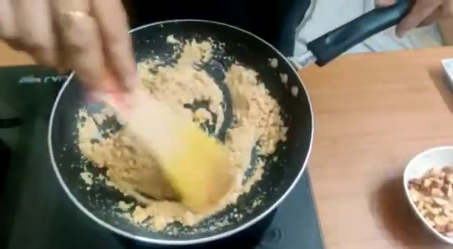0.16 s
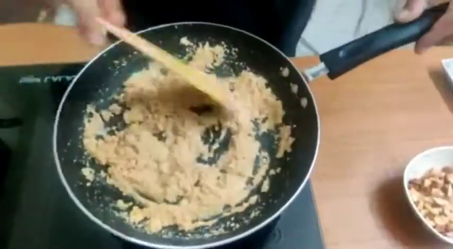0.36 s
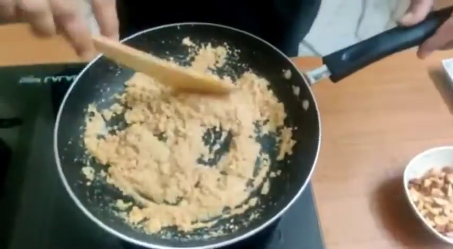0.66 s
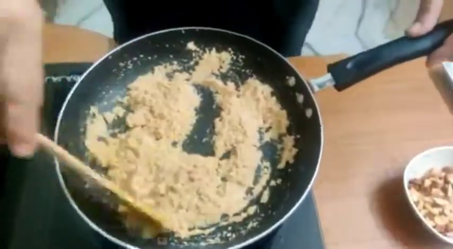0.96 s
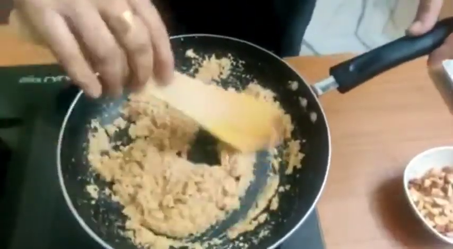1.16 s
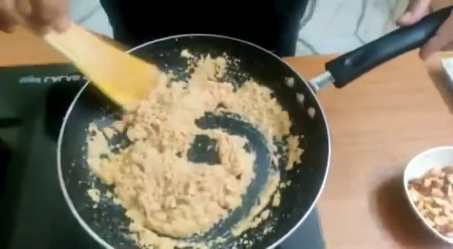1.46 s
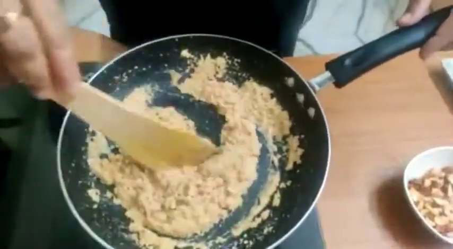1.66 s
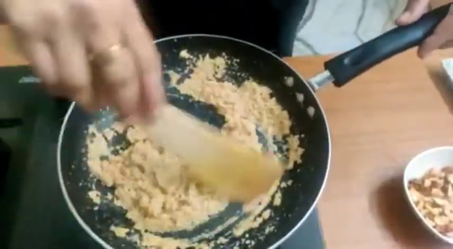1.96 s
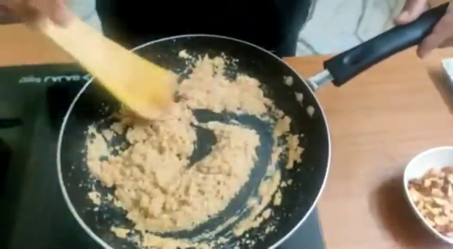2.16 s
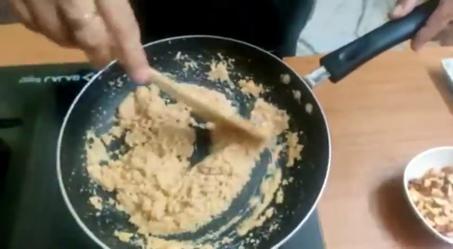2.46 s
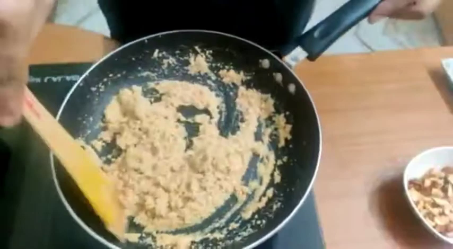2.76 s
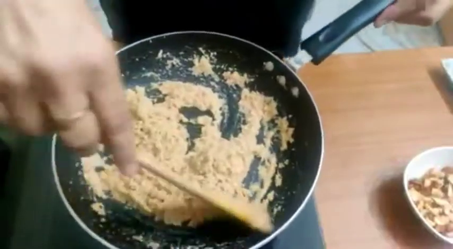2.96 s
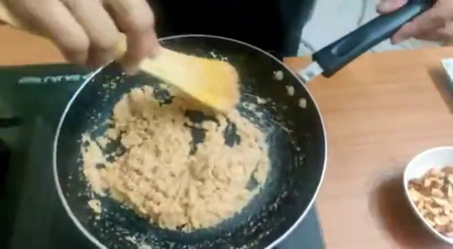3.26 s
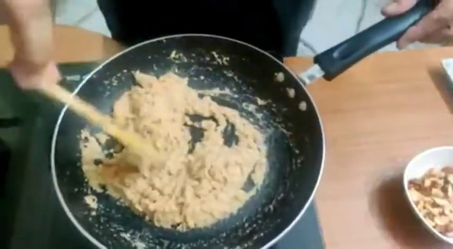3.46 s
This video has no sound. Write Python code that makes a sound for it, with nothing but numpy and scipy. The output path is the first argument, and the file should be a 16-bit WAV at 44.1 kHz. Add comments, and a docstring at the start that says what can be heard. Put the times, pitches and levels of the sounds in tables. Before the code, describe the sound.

A wooden spatula stirs moist semolina in a nonstick pan, in repeated gritty, hissing scrapes. Grains snap, the blade knocks lightly and bangles clink faintly now and then, close to the microphone in a small, quiet kitchen.

```python
"""A small kitchen, close to the hob, on a stereo microphone over quiet room tone.
A wooden spatula stirs moist roasting semolina in a nonstick pan. Each stroke crushes grains
under the blade: the friction hisses, rings blade and pan, and makes the pan hum on the hob.
Hard grains snap, the blade catches, and bangles on the stirring wrist clink now and then."""
import sys
import numpy as np
from scipy import signal
from scipy.fft import rfft, irfft, next_fast_len
from scipy.io import wavfile
from scipy.ndimage import uniform_filter1d

SR = 44100
rng = np.random.default_rng(int(sys.argv[2]) if len(sys.argv) > 2 else 0)


def generate_wav(sig):
    """Save sig (samples, or channels by samples) to the path in sys.argv[1] as 16-bit PCM at SR."""
    pcm = np.round(np.clip(np.atleast_2d(sig).T, -1, 1) * 32767).astype(np.int16)
    wavfile.write(sys.argv[1], SR, pcm)


N = 158760
FLAT_ABOVE_HZ, CUTOFF_HZ = 15000, 15900
WANDER_DB, WANDER_PER_S = 1.5, 6   # resonances and hiss bands swell as the contact moves


def from_db(db):
    """Amplitude gain of a level in dB."""
    return 10 ** (np.asarray(db) / 20)


def unit_rms(x):
    """The signal scaled to rms 1."""
    return x / np.sqrt(np.mean(x ** 2) + 1e-20)


def at_hz(curve, hz):
    """Reads a curve on a log-frequency axis."""
    points_hz, values = np.transpose(curve)
    return np.interp(np.log(hz + 1), np.log(points_hz), values)


def colour(x, gain):
    """Weights the spectrum by a function of frequency."""
    return irfft(rfft(x) * gain(np.fft.rfftfreq(N, 1 / SR)), N)


def drift(rate_hz):
    """A smooth random wander of rms about 1."""
    step, settle = 40, 2000
    r = np.exp(-2 * np.pi * step * rate_hz / SR)
    slow = signal.lfilter([1], [1, -2 * r, r * r], rng.standard_normal(N // step + settle + 2))[settle:]
    return np.interp(np.arange(N) / step, np.arange(len(slow)), unit_rms(slow))


def resonance(x, hz, width_hz):
    """A two-pole resonance with gain 1 at its peak."""
    r = np.exp(-np.pi * width_hz / SR)
    poles = [1, -2 * r * np.cos(2 * np.pi * hz / SR), r * r]
    return signal.lfilter(np.array([1, 0, -1]) * (1 - r * r) / 2, poles, x + 1e-18)


# How alike left and right are at the microphone: frequency_hz, correlation
STEREO_LIKENESS = [(25, 0.61), (60, 0.77), (130, 0.97), (300, 0.98), (700, 0.78), (1500, 0.48),
                   (3000, 0.12), (8000, 0.025)]


def stereo_noise():
    """Noise at the two ports, alike in the bass and unlike in the treble."""
    mid = colour(rng.standard_normal(N), lambda hz: np.sqrt(1 + at_hz(STEREO_LIKENESS, hz)))
    side = colour(rng.standard_normal(N), lambda hz: np.sqrt(1 - at_hz(STEREO_LIKENESS, hz)))
    return np.array([mid + side, mid - side])


# Spectrum of the quiet kitchen: frequency_hz, relative_db
ROOM_SPECTRUM = [(13, -18), (22, 19.5), (70, -2), (211, -4.5), (444, -16), (510, -16.5), (1040, -24),
                 (3420, -32.5), (4140, -32.5), (4890, -26), (5770, -33.5), (8970, -42.5), (11800, -37),
                 (14700, -32.5), (16000, -54)]


def room_tone(level_db=-59, waver_db=.5, bass_cut_hz=45):
    """The kitchen's low steady noise, wavering slightly."""
    def spectrum(hz):
        bass_cut = hz ** 2 / (hz ** 2 + bass_cut_hz ** 2)
        return from_db(at_hz(ROOM_SPECTRUM, np.minimum(hz, FLAT_ABOVE_HZ))) * bass_cut
    noise = unit_rms(colour(stereo_noise(), spectrum))
    return from_db(level_db + waver_db * drift(0.72)) * noise


def kitchen_reverb(x, t60_s=0.33, wall_cut_hz=41000, bass_cut_hz=527):
    """Near walls return the sound: eight feedback delays a side, duller on every round."""
    size = next_fast_len(N + SR)
    hz, out = np.fft.rfftfreq(size, 1 / SR), []
    dulling, bass_cut = 1 / (1 + 1j * hz / wall_cut_hz), hz / np.hypot(hz, bass_cut_hz)
    for side, lags_s in zip(x, rng.uniform(.012, .035, (2, 8))):
        loops = [from_db(-60 * lag / t60_s) * dulling * np.exp(-2j * np.pi * hz * lag) for lag in lags_s]
        echoes = sum((-1) ** k * loop / (1 - loop) for k, loop in enumerate(loops))
        out.append(irfft(rfft(side, size) * bass_cut * echoes, size)[:N])
    return np.array(out)


# Modes of a bangle: pitch_hz, relative_db, t60_s
BANGLE_MODES = [(8425, -1, .1), (9146, -1, .055), (13600, -14, .05), (14540, -5, .04), (14690, 0, .048),
                (15190, -10, .04)]
# Clinks at the stirring wrist: start_s, level_db, low_modes_db, top_modes_db
BANGLE_CLINKS = [(.143, -45, -4, 0), (0.712, -44.5, -6, 0), (0.721, -41, -22, 0), (0.7704, -38, -22, -1.5),
                 (1.6, -48, -16, 0), (2.306, -32, -27, -21)]


def bangles(rise_s=.0003):
    """Thin hard rings touch and ring in a few high modes, reaching each port at its own phase."""
    out, t = np.zeros((2, N)), np.arange(SR // 4) / SR
    attack = 1 - np.exp(-(t / rise_s) ** 2)
    for start_s, level_db, low_db, top_db in BANGLE_CLINKS:
        span = slice(int(start_s * SR), int(start_s * SR) + len(t))
        for hz, mode_db, t60_s in BANGLE_MODES:
            struck_db = level_db + mode_db + low_db * (hz < 10000) + top_db * (hz > 14000)
            tone = np.sin(2 * np.pi * (hz * t + rng.random((2, 1)) / 4))
            out[:, span] += from_db(struck_db - 60 * t / t60_s) * attack * tone
    return out


# Lone hard grains in the pan: start_s, unfiltered_db, lowest_hz
HARD_GRAINS = [(0.1819, -31.5, 1190), (0.9328, -47, 4500), (.985, -43, 6000), (1.055, -37, 4500),
               (1.4686, -42, 1200), (1.996, -34, 1200), (2.318, -41, 1200), (2.433, -41, 4000),
               (2.7417, -55, 2000), (3.297, -43, 1210), (3.565, -56, 4000)]


def grain_snaps(decay_s=.0015, band_octaves=2.3):
    """Single hard grains snap in a puff of noise; the small ones are brighter."""
    out, noise = np.zeros((2, N)), stereo_noise()
    t = np.arange(SR // 50) / SR
    for start_s, level_db, low_hz in HARD_GRAINS:
        span = slice(int(start_s * SR), int(start_s * SR) + len(t))
        high_hz = min(low_hz * 2 ** band_octaves, CUTOFF_HZ)
        band = signal.butter(2, [low_hz, high_hz], "band", fs=SR, output="sos")
        out[:, span] += signal.sosfilt(band, from_db(level_db) * np.exp(-t / decay_s) * noise[:, span])
    return out


# Modes of the pan, the blade's body and its edge: pitch_hz, width_hz, rubbed_db
PAN_MODES = [(202.5, 12, 0.5), (242.7, 3.8, -7), (276, 15.6, 0.5), (334, 23.5, -2), (402.4, 30, -1),
             (504.6, 24.4, 4), (556, 23, 5), (581, 64, 4)]
BLADE_BODY_MODES = [(791, 178, 4), (990, 107, -1.5), (1162, 114, -4.5), (1330, 38, -3.5), (1412, 41, -4),
                    (1563, 190, 5.5)]
BLADE_EDGE_MODES = [(1865, 136, 0.5), (2097, 395, -1.5), (2870, 490, -7.5), (3590, 304, 3), (3746, 550, -2)]
# The blade catches on the pan: start_s, level_db, favoured_hz
BLADE_CATCHES = [(.181, -42, 3540), (.629, -43, 1110), (0.687, -44, 1310), (0.702, -53, 1350),
                 (2.403, -37.5, 344), (2.445, -30.5, 1010), (3.04, -36.5, 350), (3.114, -35.5, 810),
                 (3.154, -39, 1290)]


def blade_knocks(focus_db_per_octave=30):
    """Each catch strikes the modes of blade and pan, hardest near its favoured pitch."""
    out = np.zeros(N)
    start_s, level_db, favoured_hz = np.transpose(BLADE_CATCHES)
    for k, (hz, width_hz, _) in enumerate(PAN_MODES + BLADE_BODY_MODES + BLADE_EDGE_MODES):
        octaves_off = np.abs(np.log2(hz / favoured_hz))
        clicks = np.zeros(N)
        clicks[(start_s * SR).astype(int)] = from_db(level_db - focus_db_per_octave * octaves_off)
        out += (-1) ** k * resonance(clicks, hz, width_hz) * SR / (2 * np.pi * width_hz)
    return out


def friction(grains_per_s=830, size_spread_db=2, grain_s=0.0013, smooth_share=0.49):
    """Grains of all sizes break at random over a smooth rub, while the blade skips."""
    sizes = from_db(size_spread_db * np.minimum(rng.exponential(1, N), 5))
    breaks = sizes * (rng.random(N) < grains_per_s / SR)
    puffs = unit_rms(signal.lfilter([1], [1, -np.exp(-1 / (grain_s * SR))], breaks + 1e-18))
    force = np.sqrt(smooth_share + (1 - smooth_share) * puffs ** 2)
    chatter = from_db(1.5 * drift(rate_hz=55))
    return force * chatter * stereo_noise()


def steadied(ring, hz, share=.6, cycles=6):
    """The push of the blade evens out part of a ring's chance swings."""
    power = uniform_filter1d(np.mean(ring ** 2, axis=0), size=int(cycles * SR / hz))
    return unit_rms(ring / (np.abs(power) + 1e-6) ** (share / 2))


def ringing(rub, modes, favoured_hz, focus_db_per_octave=26, focus_limit_db=13):
    """A rubbed part answers through its modes; those far from the favoured pitch are held back."""
    out, power = 0, 0
    for k, (hz, width_hz, mode_db) in enumerate(modes):
        held_db = np.minimum(focus_db_per_octave * np.abs(np.log2(hz / favoured_hz)), focus_limit_db)
        gain = from_db(mode_db + WANDER_DB * drift(WANDER_PER_S) - held_db)
        ring = unit_rms(resonance(resonance(rub, hz, 2 * width_hz), hz, 2 * width_hz))
        out += (-1) ** k * gain * steadied(ring, hz)
        power += gain ** 2
    return out / np.sqrt(power)


# Hiss of semolina under the blade: frequency_hz, relative_db
GRIT_SPECTRUM = [(3290, -15), (5600, 4.5), (6450, 4), (8900, 1), (10100, -3), (12200, -2), (15100, -3.5),
                 (15600, -13)]
# Bands of that hiss, each wandering alone: boundary_hz
GRIT_BANDS = [3000, 7500, 9600, 12500, 17000]


def grit(rub, level_db, finest_above_hz=9000, finest_follows=.75):
    """The hiss of crushed grains shifts in colour band by band; the finest swells least."""
    hiss = unit_rms(colour(rub, lambda hz: from_db(at_hz(GRIT_SPECTRUM, np.minimum(hz, FLAT_ABOVE_HZ)))))
    held_db = (1 - finest_follows) * np.maximum(level_db - np.median(level_db), 0)
    out = np.zeros((2, N))
    for low, high in zip(GRIT_BANDS, GRIT_BANDS[1:]):
        band_db = level_db + WANDER_DB * drift(WANDER_PER_S) - held_db * (low > finest_above_hz)
        out += from_db(band_db) * colour(hiss, lambda hz: (hz > low) & (hz <= high))
    return out


# Modes of the pan's wall and of the pan on the hob: pitch_hz, width_hz, rubbed_db
PAN_WALL_MODES = [(4480, 200, -10), (4790, 190, 1), (5180, 240, 0), (5700, 300, -9)]
HOB_MODES = [(133, 12, 0)]
# The spatula close up, one list a stroke; the last three columns are favoured pitches:
# time_s, grit_db, wall_db, edge_db, body_db, pan_db, hob_db, edge_hz, body_hz, pan_hz
SPATULA_STROKES = [
    [(0.0, -54, -62, -58, -66, -53, -51, 2880, 1090, 260),
     (0.032, -68, -67, -70, -75, -65, -64, 2790, 1080, 233),
     (0.046, -70, -73, -67, -76, -78, -62.5, 2510, 1080, 224),
     (0.06, -67, -75, -75, -73, -67, -61, 2420, 1050, 228),
     (0.074, -79, -77, -73, -89, -60, -77, 2400, 1030, 235),
     (0.084, -90, -83, -93, -89, -68, -72, 2450, 982, 247),
     (0.124, -90, -92, -92, -75, -73, -83, 2550, 897, 263),
     (0.135, -88, -72, -93, -81, -83, -81, 2530, 900, 249)],
    [(0.172, -58, -68, -63, -70, -70, -75, 3460, 1500, 384),
     (0.182, -55, -53, -42.5, -55, -56, -73, 3660, 1460, 395),
     (0.252, -42, -41, -41.5, -56.5, -55.5, -57, 2780, 1410, 443),
     (0.302, -49.5, -51.5, -51, -56, -59, -59, 2440, 1120, 373),
     (0.342, -53, -59, -55, -61.5, -62.5, -61, 3000, 1160, 249),
     (0.396, -56, -65, -64, -69, -66.5, -63, 2600, 1080, 350),
     (0.478, -83, -79, -81, -81, -65.5, -89, 2540, 823, 238),
     (0.6, -75, -87, -84, -99, -82, -80, 2470, 853, 256)],
    [(0.616, -55.5, -64, -64.5, -76, -70, -59, 2520, 1110, 287),
     (0.634, -52, -55, -56.5, -49.5, -55.5, -64, 2770, 1060, 312),
     (0.676, -50, -53.5, -52, -53, -60.5, -59, 2450, 1260, 326),
     (0.712, -49, -55, -54.5, -51, -67, -69, 2640, 1250, 306),
     (0.746, -60, -63, -61.5, -81, -68, -73, 2800, 1210, 265),
     (0.79, -59, -62, -62.5, -66, -64, -72, 2700, 1080, 254),
     (0.812, -62.5, -69, -67, -73, -76, -83, 2730, 1040, 264),
     (0.88, -69, -76, -72, -78, -63, -66, 2730, 912, 259)],
    [(0.885, -63.5, -70.5, -68.5, -68, -61, -58.5, 2820, 930, 240),
     (1.028, -55.5, -61, -57.5, -53, -53.5, -51.5, 2820, 960, 252),
     (1.051, -44.5, -49, -56.5, -52, -47, -44, 2830, 950, 264),
     (1.087, -49.5, -50, -51, -54.5, -51.5, -42, 2900, 1120, 216),
     (1.133, -44.5, -48.5, -51, -49.5, -48.5, -51.5, 2780, 1100, 266),
     (1.169, -48, -56, -49.5, -51, -51.5, -43, 2730, 1300, 203),
     (1.295, -58, -59, -62, -66.5, -65.5, -65.5, 2620, 1010, 230),
     (1.407, -73, -84, -79, -100, -84, -72, 2630, 1020, 220),
     (1.44, -67, -78, -70, -86, -85, -91, 2850, 965, 260)],
    [(1.45, -60, -72, -66, -74, -75, -69, 2250, 1310, 280),
     (1.47, -51, -63, -47, -65, -67, -69, 2200, 1210, 377),
     (1.498, -51, -47.5, -46, -46.5, -56.5, -73, 2540, 1080, 413),
     (1.576, -52, -56, -50.5, -48.5, -55, -66, 2390, 1080, 347),
     (1.626, -44, -44, -48.5, -41.5, -65, -74, 2850, 996, 475),
     (1.686, -65.5, -75, -62.5, -75, -61, -82, 2780, 960, 258),
     (1.786, -95, -85, -83, -73, -89, -85, 2630, 901, 266),
     (1.815, -77, -87, -89, -100, -83, -87, 2480, 869, 223)],
    [(1.822, -65, -74, -80, -62, -78, -86, 2820, 1080, 272),
     (1.838, -58, -65, -60, -57, -53.5, -61, 2900, 1140, 270),
     (1.95, -46, -47, -53, -53.5, -49, -52.5, 2820, 1000, 274),
     (1.984, -42, -58, -47.5, -58.5, -60, -75, 3280, 1140, 307),
     (2.002, -44.5, -48, -44, -45.5, -58, -75, 2760, 1130, 326),
     (2.072, -54.5, -55.5, -52, -58.5, -62, -55.5, 2570, 1480, 245),
     (2.162, -56, -59.5, -62.5, -70, -68, -67, 2680, 1320, 243),
     (2.298, -91, -96, -82, -99, -81, -76, 2200, 1090, 229)],
    [(2.309, -71, -62, -82, -91, -76, -70, 2270, 1120, 320),
     (2.317, -47, -54.5, -44, -52.5, -62, -63, 2500, 1090, 319),
     (2.365, -48.5, -50.5, -45.5, -52, -47.5, -48, 2710, 1070, 330),
     (2.457, -46, -51, -51, -44.5, -52, -52, 2860, 1040, 350),
     (2.499, -54, -54, -57.5, -71, -52, -66, 2690, 1110, 500),
     (2.609, -70, -74, -71, -69, -74, -65.5, 2500, 1070, 243),
     (2.697, -88, -88, -86, -72, -62, -59, 2390, 1010, 229),
     (2.72, -63, -72, -67, -67, -77, -68, 2130, 1230, 220)],
    [(2.73, -55, -72, -55, -66, -68, -72, 2880, 926, 349),
     (2.74, -43, -42.5, -47.5, -49.5, -59.5, -63, 2820, 900, 355),
     (2.782, -52, -51, -48, -49.5, -52.5, -54, 2770, 840, 383),
     (2.89, -52.5, -50, -49.5, -50, -51, -57, 2500, 1160, 453),
     (2.936, -52.5, -48, -51.5, -55.5, -53, -63, 2740, 905, 475),
     (3.062, -45, -47.5, -47.5, -48.5, -47.5, -56, 2330, 1240, 326),
     (3.11, -44, -46.5, -46, -45, -52, -53, 2550, 895, 454),
     (3.15, -49, -45.5, -48, -48, -47, -61, 2780, 840, 297)],
    [(3.155, -43.5, -41, -44, -43.5, -48, -44.5, 2700, 1220, 356),
     (3.181, -51, -58, -51.5, -54, -52, -53, 3000, 1190, 272),
     (3.205, -36.5, -43, -41, -46, -48, -44, 3120, 1160, 239),
     (3.271, -45.5, -47.5, -46.5, -54.5, -54.5, -62, 2660, 1100, 244),
     (3.303, -43.5, -43.5, -43, -50.5, -56.5, -59, 2660, 1160, 303),
     (3.339, -57, -61, -55.5, -65, -58, -77, 2960, 1240, 253),
     (3.363, -52, -56.5, -54, -64.5, -62, -53, 3200, 1240, 223),
     (3.55, -100, -103, -94, -91, -78, -100, 2690, 843, 274)],
]


def stirring(wall_hz=5000):
    """The friction of each stroke sounds as grit and rings through blade, pan and hob."""
    time_s, *columns = np.vstack(SPATULA_STROKES).T
    curves = [np.interp(np.arange(N) / SR, time_s, column) for column in columns]
    grit_db, wall_db, edge_db, body_db, pan_db, hob_db, edge_hz, body_hz, pan_hz = curves
    rub = friction()
    return (grit(rub + friction(), grit_db)
            + from_db(wall_db) * ringing(rub, PAN_WALL_MODES, wall_hz)
            + from_db(edge_db) * ringing(rub, BLADE_EDGE_MODES, edge_hz)
            + from_db(body_db) * ringing(rub, BLADE_BODY_MODES, body_hz)
            + from_db(pan_db) * ringing(rub, PAN_MODES, pan_hz)
            + from_db(hob_db) * ringing(rub, HOB_MODES, HOB_MODES[0][0]))


def scene(reverb_db=-13.5, bangle_send_db=-8):
    """Pan and wrist up close, the kitchen's reflections and room tone behind them."""
    pan = stirring() + grain_snaps() + blade_knocks()
    wrist = bangles()
    reflections = kitchen_reverb(pan + from_db(bangle_send_db) * wrist)
    return pan + wrist + from_db(reverb_db) * reflections + room_tone()


# Balance of the microphone's two ports: frequency_hz, left_over_right_db
PORT_BALANCE = [(60, -3), (99, 1.5), (160, -2.5), (270, 0), (450, -0.5), (740, -1.5), (1220, -0.5),
                (2010, -1.5), (3330, -5.5), (5500, -0.5), (9080, 12), (15000, -4)]


def record(dry):
    """The microphone's two ports differ most in the treble; the very top is cut steeply."""
    ports = colour(dry, lambda hz: from_db(np.outer([.5, -.5], at_hz(PORT_BALANCE, hz))))
    top_cut = signal.cheby2(22, 70, CUTOFF_HZ + 200, fs=SR, output="sos")
    return signal.sosfilt(top_cut, ports)


dry = scene()
out = record(dry)
generate_wav(out)
```